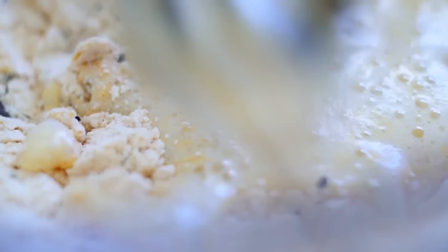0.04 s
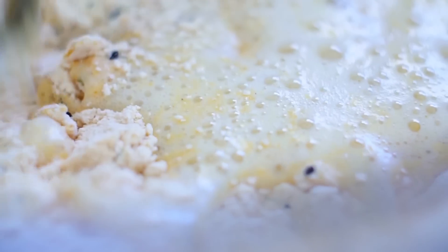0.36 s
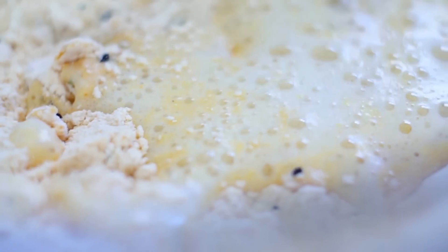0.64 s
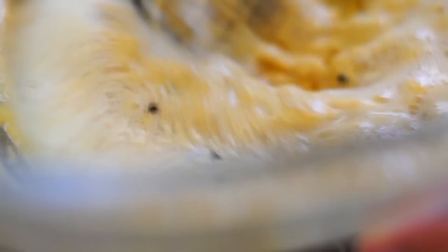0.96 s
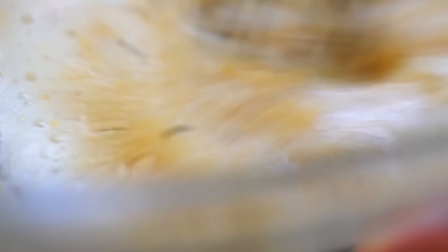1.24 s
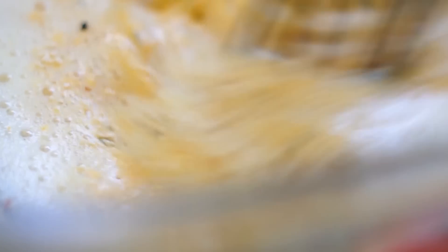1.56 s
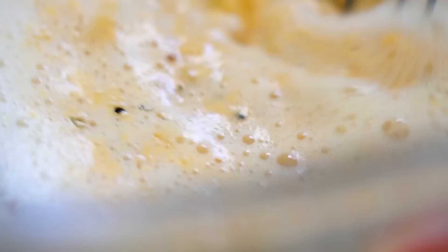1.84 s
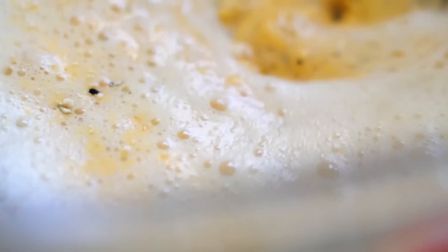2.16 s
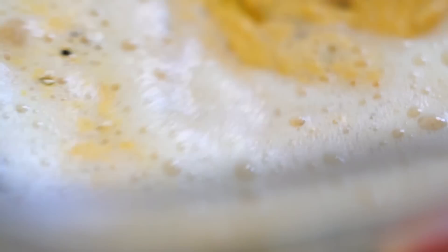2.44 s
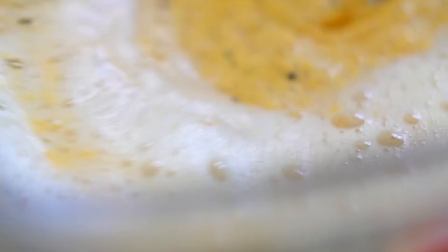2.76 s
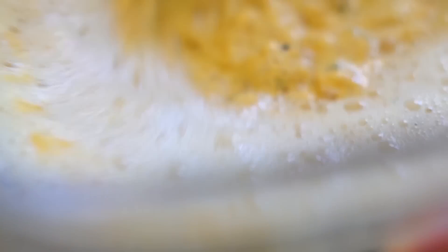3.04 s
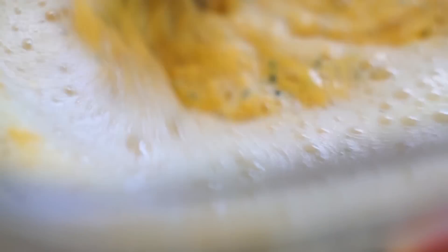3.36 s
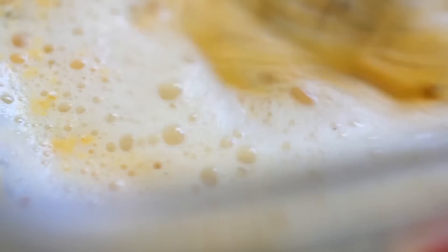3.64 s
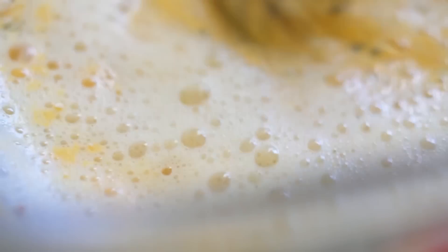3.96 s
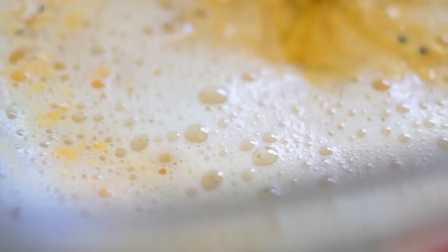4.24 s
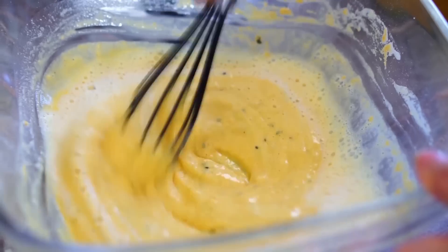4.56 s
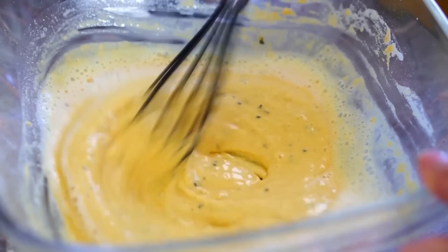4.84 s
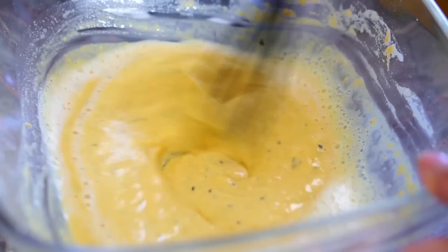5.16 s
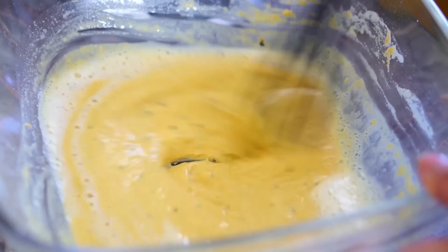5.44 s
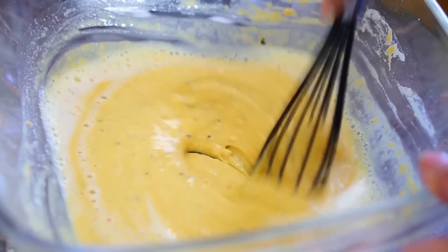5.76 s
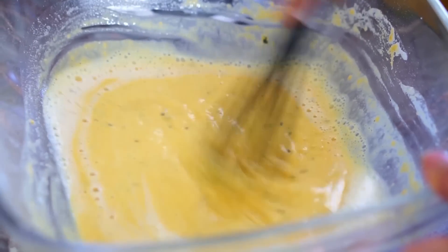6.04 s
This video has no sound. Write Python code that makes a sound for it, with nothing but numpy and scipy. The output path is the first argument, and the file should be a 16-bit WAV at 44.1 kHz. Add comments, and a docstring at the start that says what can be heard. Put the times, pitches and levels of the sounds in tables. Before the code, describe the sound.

Thick, carbonated batter fizzes and crackles close by in a glass bowl. After a few opening bumps on the worktop and one knock on the bowl, a whisk sweeps through it with soft sloshes, plops and tiny clicks of bursting bubbles. The fizzing then eases, and the whisking turns into a run of low, resonant knocks, about four a second. Faint, steady kitchen noise lies behind.

```python
"""On a kitchen worktop, batter made with sparkling water is whisked in a glass bowl.
Escaping gas makes a fine fizz of tiny ringing bubbles, which swells with each sweep. The wires
squelch through the batter, tearing air pockets open, and larger bubbles burst with sharp clicks.
Something is put down with a thud at first; later the brisk strokes knock the bowl, and the
worktop's modes boom under it. Faint room noise lies behind it all."""
import sys
import numpy as np
from scipy import signal
from scipy.fft import rfft, irfft, next_fast_len
from scipy.io import wavfile

SR = 44100
rng = np.random.default_rng(int(sys.argv[2]) if len(sys.argv) > 2 else 0)


def dump(signal):
    """Clip the signal to [-1, 1] and save it as 16-bit WAV at the path in sys.argv[1]."""
    limited = np.clip(np.atleast_2d(signal).T, -1, 1)
    pcm = np.round(limited * 32767).astype(np.int16)
    wavfile.write(sys.argv[1], SR, pcm)


N = 272832

# large air pockets torn open by the wires: start_s, smack_db, plop_db, pitch_hz, smack_t60_s, spray_db
AIR_POCKETS = [(1.064, -32.5, -27.5, 2930, 0.04, -52), (1.346, -31, -31.5, 2750, 0.071, -65),
               (1.379, -34, -52, 3100, .03, -62), (1.524, -29, -50, 1820, 0.073, -50),
               (1.535, -29.5, -33, 2800, 0.2, -34.5), (1.737, -26.5, -37.5, 3020, 0.022, -41.5),
               (1.87, -32, -33, 1994, .035, -37), (2.196, -35, -31, 1900, .02, -52),
               (2.313, -27.5, -30.5, 2130, 0.019, -44), (2.353, -34.5, -39, 3220, 0.03, -52),
               (2.79, -35, -48, 3820, .027, -51), (2.82, -32.5, -48, 2600, .035, -36),
               (2.891, -33.5, -35.5, 1960, 0.019, -41), (3.297, -33, -43, 2617, .08, -47),
               (3.595, -30, -33, 2250, 0.015, -41), (4.179, -36, -46, 3920, 0.031, -41.5),
               (5.905, -38.5, -31, 1904, 0.029, -53)]


def foam(gas_db, depth):
    """Bubble resonance: fine bubbles fizz high, larger ones crackle lower; both swell with each sweep."""
    # spectrum of the fine foam: frequency_hz, level_db
    fizz_spectrum = [(3000, -5), (5500, -8), (8000, -3), (11000, 0), (13500, 3), (16000, -1)]
    # spectrum of the larger bubbles: frequency_hz, level_db
    crackle_spectrum = [(900, -9.5), (1500, -3), (2000, 2), (3200, -2), (4300, -6.5), (6500, -7.5),
                        (10000, -38)]
    fizz_db = gas_db + 4 + 3 * depth
    crackle_db = -48 + 0.93 * (gas_db - gas_db.mean()) + 2 * depth
    fizz = bubbles(per_s=2700, spread_db=3.5, clump_db=2.0, t60_cycles=2.1, low_hz=4860, high_hz=16000)
    crackle = bubbles(per_s=1700, spread_db=6.0, clump_db=2.5, t60_cycles=7.5, low_hz=1190, high_hz=7700)
    return (from_db(fizz_db) * diffused(fizz, fizz_spectrum, wet_db=7.5, t60=0.11)
            + from_db(crackle_db) * diffused(crackle, crackle_spectrum, wet_db=9.5, t60=0.34))


def bubbles(per_s, spread_db, clump_db, t60_cycles, low_hz, high_hz):
    """Damped oscillators: clumps of random impulses, most of them faint, ring bubbles of 20 sizes."""
    born = rng.random(N) < per_s * from_db(clump_db * drift(40)) / SR
    strength = from_db(spread_db * np.minimum(rng.exponential(1, N), 5))
    clicks = born * strength * rng.choice([-1, 1], N)
    size_of, out = rng.integers(0, 20, N), 0
    for size, hz in enumerate(np.geomspace(low_hz, high_hz, 20)):
        radius, angle = fade(hz / SR, t60_cycles), 2 * np.pi * hz / SR
        drive = np.sqrt(hz * (1 - radius ** 2)) * np.array([1, 0, -1])
        feedback = [1, -2 * radius * np.cos(angle), radius ** 2]
        out = out + signal.lfilter(drive, feedback, clicks * (size_of == size) + 1e-18)
    return out


def sweep_depth(lag_s):
    """Amplitude envelope: each sweep of the whisk through the foam is one Gaussian swell."""
    # deep sweeps of the whisk: middle_s, length_s, depth_fraction
    sweeps = [(1.081, 0.23, .4), (1.211, 0.13, 0.3), (1.533, 0.22, 1.0), (1.868, 0.063, .6),
              (2.177, .1, 0.8), (2.35, 0.17, 0.7), (2.52, 0.12, 1), (2.87, 0.094, 1), (3.29, 0.27, 1),
              (3.554, 0.16, 0.8), (4.183, 0.089, 0.51), (4.56, 0.11, 0.3)]
    t = np.arange(N) / SR - lag_s
    return sum(depth * np.exp(-(2 * (t - middle_s) / length_s) ** 2)
               for middle_s, length_s, depth in sweeps)


def squelches(drag_db):
    """Cavity rupture: a wire tears an air pocket open, giving a faintly pitched smack over a low plop."""
    # lesser pockets open most often where the whisk drags hardest
    lesser = [(start_s, -43 + db, -42 + db, 2388 * ratio, 0.031)
              for start_s, db, ratio in random_events(11, drag_db, spread_db=9.5, octaves=0.92)]
    out, t = np.zeros((2, N)), np.arange(SR // 10) / SR
    for start_s, smack_db, plop_db, hz, smack_t60_s, *_ in [*AIR_POCKETS, *lesser]:
        tear = burst(t, smack_t60_s, click_db=1)
        smack = unit_onset(band(tear, hz / 1.15, hz * 1.15) + 0.6 * band(tear, 1300, 4000), 0.007)
        plop = unit_onset(band(burst(t, t60=0.068, click_db=-5), 436, 950), 0.0068)
        sound = from_db(smack_db + 0.5) * smack + from_db(plop_db - 3) * plop
        add(out, start_s, reverberate(sound, room_db=-4, bowl_db=-6))
    return out


def pops(gas_db):
    """Film rupture: a bubble snaps in one sharp click, and its tiny cavity rings very high."""
    # large bubbles bursting: start_s, ring_db, snap_db, pitch_hz
    large = [(.7645, -42, -50, 14700), (.981, -46, -37, 14600), (1.2218, -37, -43, 15200),
             (1.453, -39, -46, 12100), (1.4768, -37, -45, 11100), (2.147, -30, -36.5, 13100),
             (2.5414, -31.5, -45, 11800), (2.836, -33, -49, 13800), (2.8836, -34, -36.5, 14600),
             (3.071, -35.5, -39, 9900), (3.7407, -35.5, -51, 11900), (4.0325, -32.5, -48.5, 14500),
             (4.6074, -33, -35.5, 14900), (5.1732, -34.5, -47, 14900), (5.2579, -44, -43.5, 13700)]
    pop_hz = 12800
    # the tearing film of each large air pocket throws spray
    spray = [(start_s, db, db + 0.5, pop_hz) for start_s, *_, db in AIR_POCKETS]
    # lesser bubbles burst most often where the most gas leaves
    lesser = [(start_s, -42 + db, -43.5 + db, pop_hz * ratio)
              for start_s, db, ratio in random_events(8.4, gas_db, spread_db=1, octaves=0.46)]
    out, t = np.zeros((2, N)), np.arange(SR // 20) / SR
    for start_s, ring_db, snap_db, hz in [*large, *spray, *lesser]:
        snap = unit_onset(band(burst(t, t60=0.0065, click_db=0), 4800, 10000), 0.006)
        ring = unit_onset(band(burst(t, t60=0.0065, click_db=2), hz / 1.22, hz * 1.22), 0.006)
        sound = from_db(snap_db + 5) * snap + from_db(ring_db + 5.5) * ring
        add(out, start_s, reverberate(sound, room_db=-6, bowl_db=-2))
    return out


def slosh(drag_db, fold_db):
    """Low bubble resonances: thick batter folds softly round the wires and lets out short gurgles."""
    # spectrum of the gurgles: frequency_hz, level_db
    gurgle_spectrum = [(200, -11), (380, -4), (510, 6), (680, 0.5), (1200, -0.5), (2200, -9)]
    # spectrum of the folding batter: frequency_hz, level_db
    fold_spectrum = [(45, -22), (100, 2.5), (150, -0.5), (240, 0), (400, -10.5), (700, -23)]
    gurgles = bubbles(per_s=1000, spread_db=2.0, clump_db=4.0, t60_cycles=8.4, low_hz=308, high_hz=2050)
    reflections = band(coloured(rng.standard_normal(N), gurgle_spectrum), 270, 3000)
    folds = bubbles(per_s=360, spread_db=1.5, clump_db=3.5, t60_cycles=8.1, low_hz=56, high_hz=457)
    return (from_db(drag_db - 1.5) * (coloured(gurgles, gurgle_spectrum) + 1.14 * antiphase(reflections))
            + from_db(fold_db - 6) * coloured(folds, fold_spectrum))


def bowl_knocks():
    """Coupled vibration: a stroke knocks the bowl, which drives the worktop beneath it."""
    # strokes that knock the bowl: start_s, boom_db, body_db, brightness_db_per_register, thump_db
    knocks = [(.919, -26, -24, -6, 5.5), (4.478, -24, -22.5, -5.5, 6), (4.558, -34, -29.5, -0.6, 5),
              (4.726, -31, -28.5, -3, 3.5), (5.001, -34.5, -25, -1.5, -4), (5.262, -30, -21.5, -3, 0),
              (5.530, -28, -19, -2.5, 1), (5.802, -32, -23, -2, -2)]
    # modes of the worktop and full bowl, struck through the bowl: pitch_hz, level_db
    bowl_modes = [(57.0, 15), (65.0, 8.5), (74.0, 9), (135.0, 2.5), (148.0, -3.5), (198.0, -21),
                  (211.0, -17.5), (244.0, -13.5), (264.0, -14), (334.0, -1.5), (395.0, -9), (429.0, -7),
                  (448.0, -5), (473.0, -27), (539.0, -35), (554.0, -4.5), (579.0, -4.5), (598.0, -18),
                  (643.0, -13.5), (694.0, -10.5), (727.0, -11.5), (789.0, -14.5), (931.0, -17),
                  (974.0, -17), (1026.0, -6.5), (1036.0, -30), (1047.0, -38), (1217.0, -10)]
    return blows(knocks, bowl_modes, thump_t60=0.097, swell_s=0.0051, gain_db=-1.1, lag_samples=3.0)


def worktop_thuds():
    """Plate vibration: a direct bump sets the worktop booming in its own modes."""
    # bumps on the worktop: start_s, boom_db, body_db, brightness_db_per_register, thump_db
    thuds = [(0.0, -40.5, -41, -9, 7), (.211, -37, -46, -14, -5), (.243, -49, -23, -9, 3.5),
             (.274, -28, -11.5, -3, 6), (.42, -44, -23, -9.5, 9), (.532, -33.5, -26.5, -7.5, 0),
             (4.494, -38, -17, -20, 13.5)]
    # modes of the worktop, struck directly: pitch_hz, level_db
    worktop_modes = [(76, -2), (89, -4), (101, 14), (119, 1), (134, 2.5), (148, 5.5), (167, 6.5),
                     (181, -0.5), (208, 1), (234, 5), (320, 6.5), (367, -4), (381, -12), (475, -9),
                     (539, -0.5), (568, 1), (600, 0), (620, -16), (666, -3), (768, -4.5), (1005, -19),
                     (1140, -16), (1236, -27), (1490, -22), (1940, -27)]
    return blows(thuds, worktop_modes, thump_t60=0.14, swell_s=0.0093, gain_db=-2.1, lag_samples=3.7)


def blows(strikes, modes, thump_t60, swell_s, gain_db, lag_samples):
    """Impact response: a short thump, then decaying modes and a dense ring that fills the room."""
    # boom, body, knock and clack registers of a blow: low_hz, high_hz, t60_s, dense_db, side_db
    registers = [(52.6, 89.5, 0.71, -4.5, -25), (109, 226, 0.46, -5, -28), (311, 696, 0.45, -1, -10),
                 (850, 1620, 0.38, -0.5, -7)]
    out, t = np.zeros((2, N)), np.arange(SR) / SR
    hz, mode_db = np.transpose(modes)
    signs = (-1) ** np.arange(len(hz))  # neighbours start opposed, so the ring swells and throbs
    tones = (signs * from_db(mode_db))[:, None] * np.sin(2 * np.pi * hz[:, None] * t)
    register_of = np.searchsorted([row[0] for row in registers[1:]], hz)
    for start_s, boom_db, body_db, bright_db, thump_db in strikes:
        levels_db = boom_db, body_db, body_db + bright_db, body_db + 2 * bright_db - 8
        strengths = from_db(rng.normal(0, 1.5, len(hz)))
        for k, (low_hz, high_hz, t60_s, dense_db, side_db) in enumerate(registers):
            envelope = fade(t, t60_s) * (1 - np.exp(-t / swell_s))
            dense, side = unit_rms(band(rng.standard_normal((2, len(t))), low_hz, high_hz))
            ring = unit_rms((strengths * (register_of == k)) @ tones) + from_db(dense_db) * dense
            # one push in the bass, a rattle in the upper registers
            thump = band(burst(t, thump_t60, click_db=7.5 - 6 * k), low_hz, high_hz)
            mid = unit_onset(ring * envelope, 0.11) + from_db(thump_db) * unit_onset(thump, 0.0135)
            width = from_db(side_db) * antiphase(unit_onset(side * envelope, 0.056))
            stereo = spaced(mid, lag_samples) + width
            add(out, start_s, from_db(levels_db[k] + gain_db) * unit_onset(stereo, 0.029))
    return out


def wires(start_s, rise_s, t60):
    """Narrow resonances: the whisk's wires sing faintly as it is taken up."""
    # modes of the wires: pitch_hz, level_db
    wire_modes = [(4050, -56.5), (6650, -58)]
    t = np.maximum(np.arange(N) / SR - start_s, 0)
    tones = sum(from_db(db) * unit_rms(band(rng.standard_normal((2, N)), hz - 70, hz + 70))
                for hz, db in wire_modes)
    envelope = (1 - np.exp(-t / rise_s)) * fade(t, t60)
    return tones * envelope / envelope.max()


def diffused(x, spectrum, wet_db, t60):
    """Diffuse field: reflections merge into a wash that follows the bubbles' power, unlike at each ear."""
    retained = fade(1 / SR, t60) ** 2
    power = signal.lfilter([1 - retained], [1, -retained], x ** 2 + 1e-18)
    wash = np.sqrt(power) * rng.standard_normal((2, N))
    wet = from_db(wet_db)
    return (coloured(x, spectrum) + wet * coloured(wash, spectrum)) / np.sqrt(1 + wet ** 2)


def reverberate(x, room_db, bowl_db):
    """Convolution: direct sound, quick bowl reflections and the room's tail, new for each event and ear."""
    t = np.arange(SR // 3) / SR
    inside, tail = rng.standard_normal((2, 2, len(t)))
    inside *= fade(t, t60=0.098) * (t > 0.0004)
    tail *= fade(t, t60=0.33) * (t > 0.004)
    response = (from_db(bowl_db) * unit_rms(inside) + from_db(room_db) * unit_rms(tail)) / np.sqrt(len(t))
    response[:, 0] += 1
    return signal.fftconvolve(x[None], response / np.sqrt(np.sum(response ** 2) / 2), axes=1)


def room_tone(level_db):
    """Interaural coherence: the bass of the steady kitchen noise is alike at both ears, the hiss is not."""
    # spectrum of the room noise: frequency_hz, level_db
    room_spectrum = [(25, 5.5), (70, 8), (200, 4.5), (350, 0), (800, -5.5), (1800, -11), (3500, -9.5),
                     (9000, -15)]
    # soft steady resonances in the hiss: pitch_hz, width_hz, level_db
    whirrs = [(1087, 63, -57.5), (1900, 166, -55.5)]
    mid, side, hiss = rng.standard_normal((3, N))
    out = from_db(level_db) * coloured(mid + 1.33 * antiphase(band(side, 200, 12300)), room_spectrum)
    wide_hiss = hiss + 1.04 * antiphase(side)
    for hz, width_hz, db in whirrs:
        out += from_db(db) * unit_rms(band(wide_hiss, hz - width_hz / 2, hz + width_hz / 2))
    return out


def random_events(peak_per_s, activity_db, spread_db, octaves):
    """Random thinning: the event rate follows an activity's power. Rows: start_s, size_db, pitch_ratio."""
    when, luck, size, pitch = rng.random((128, 4)).T
    per_s = peak_per_s * from_db(activity_db - activity_db.max())[(when * N).astype(int)] ** 2
    events = np.transpose([when * N / SR, spread_db * (size - 0.5), 2 ** (octaves * (pitch - 0.5))])
    return events[luck < per_s * N / SR / len(when)]


def burst(t, t60, click_db):
    """Broadband transient: a sharp click followed by a dying rustle."""
    rustle = rng.standard_normal(len(t)) * fade(t, t60)
    return rustle / np.linalg.norm(rustle) + from_db(click_db) * (t == 0)


def drift(per_s):
    """Random modulation at unit power, with per_s new values a second."""
    knots = rng.standard_normal(1024)
    return unit_rms(np.interp(np.arange(N) / SR * per_s, np.arange(len(knots)), knots))


def band(x, low_hz, high_hz):
    """Gentle causal band-pass."""
    return signal.sosfilt(signal.butter(2, [low_hz, high_hz], "band", fs=SR, output="sos"), x + 1e-18)


def coloured(x, spectrum):
    """Spectral shaping of a steady sound, returned at unit power."""
    hz, db = np.transpose(spectrum)
    size = next_fast_len(N)
    log_hz = np.log(np.fft.rfftfreq(size, 1 / SR) + 1)
    gain = from_db(np.interp(log_hz, np.log(hz), db, left=-60))
    return unit_rms(irfft(rfft(x, size) * gain, size)[..., :N])


def panned(x, left_db):
    """Interaural level difference: positive leans left, negative right."""
    return x * from_db(np.array([[left_db], [-left_db]]) / 2)


def spaced(x, lag_samples):
    """Interaural time difference: the right ear hears the sound later."""
    n = np.arange(len(x))
    return np.array([np.interp(n - side * lag_samples / 2, n, x, left=0, right=0) for side in (-1, 1)])


def antiphase(x):
    """Opposite polarity at the two ears."""
    return x * [[1], [-1]]


def from_db(db):
    """Decibels to gain."""
    return 10 ** (np.asarray(db) / 20)


def fade(t, t60):
    """Exponential decay, 60 dB down at t60."""
    return from_db(-60 * t / t60)


def unit_rms(x):
    """Scale to unit power."""
    return x / np.sqrt(np.mean(x ** 2) + 1e-20)


def unit_onset(x, seconds):
    """Scale to unit power over the opening seconds."""
    return x / np.sqrt(np.mean(x[..., :int(seconds * SR)] ** 2) + 1e-20)


def curve(points):
    """Linear interpolation of (time_s, value) points at every sample."""
    return np.interp(np.arange(N) / SR, *np.transpose(points))


def add(out, start_s, sound):
    """Mix a sound in at start_s."""
    start = round(start_s * SR)
    out[..., start:start + sound.shape[-1]] += sound[..., :N - start]


def scene():
    """Superposition of wet sounds from the bowl, blows through the worktop, and the room."""
    # gas leaving the batter, at rest, whisked up, then going flat: time_s, level_db
    gas_flow = [(0, -51.5), (.3, -51.5), (.48, -46), (.91, -45.5), (.925, -38.5), (1.33, -42), (3.75, -42),
                (3.79, -48.5), (4.5, -46), (4.85, -49.5), (5.95, -51), (6.19, -55.5)]
    # how hard the whisk drags through the batter: time_s, level_db
    stirring = [(.88, -78), (.95, -48.5), (3.75, -49), (4.3, -56), (4.6, -46), (6.19, -48.5)]
    impacts = worktop_thuds() + bowl_knocks()
    room = room_tone(level_db=-46.5)
    gas_db, stir_db, depth = curve(gas_flow), curve(stirring), sweep_depth(lag_s=0)
    drag_db = stir_db + 5.5 * depth
    fold_db = stir_db + 5.5 * sweep_depth(lag_s=0.12)  # the batter folds back behind the whisk
    bowl = foam(gas_db, depth) + slosh(drag_db, fold_db) + wires(start_s=0.3, rise_s=0.25, t60=0.77)
    bowl += squelches(drag_db) + pops(gas_db)
    return panned(bowl, left_db=-2.0) + panned(impacts, left_db=1.3) + room


def record(dry):
    """Band limiting: a steep low-pass cuts the treble above 16 kHz."""
    return signal.sosfilt(signal.ellip(12, 0.2, 80, 16000, fs=SR, output="sos"), dry)


dry = scene()
out = record(dry)
dump(out)
```